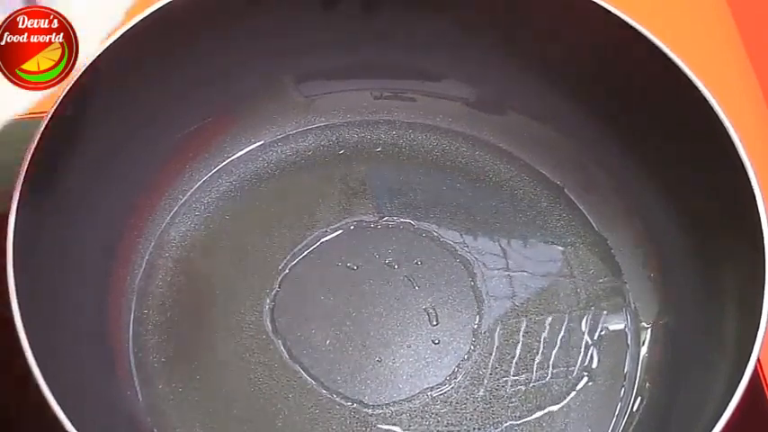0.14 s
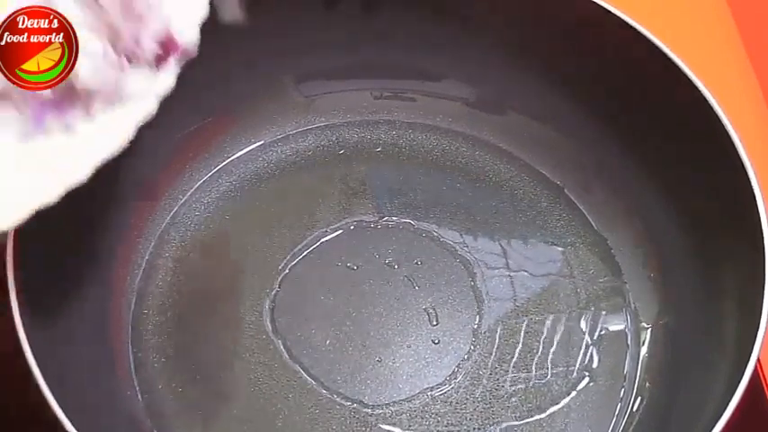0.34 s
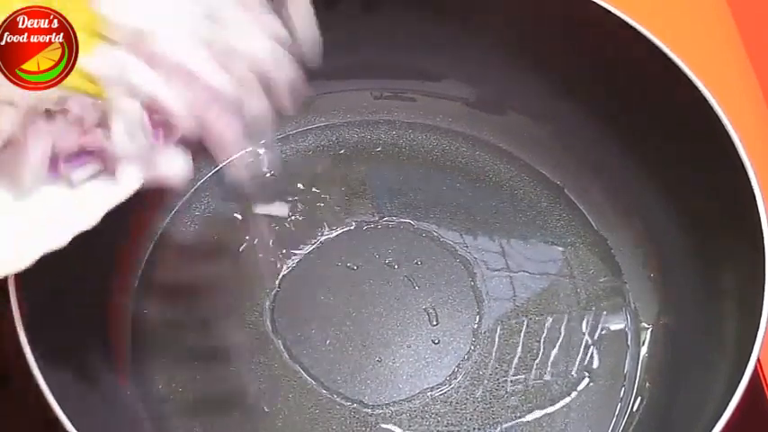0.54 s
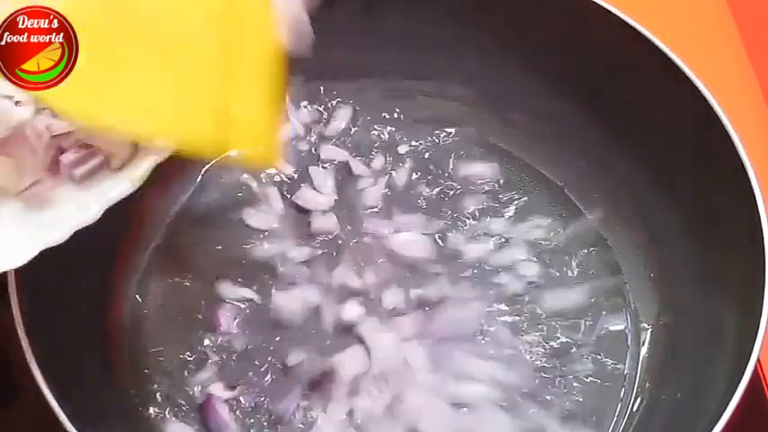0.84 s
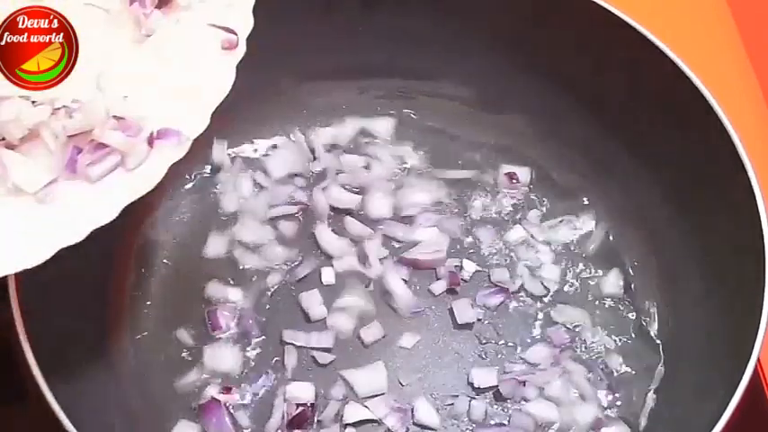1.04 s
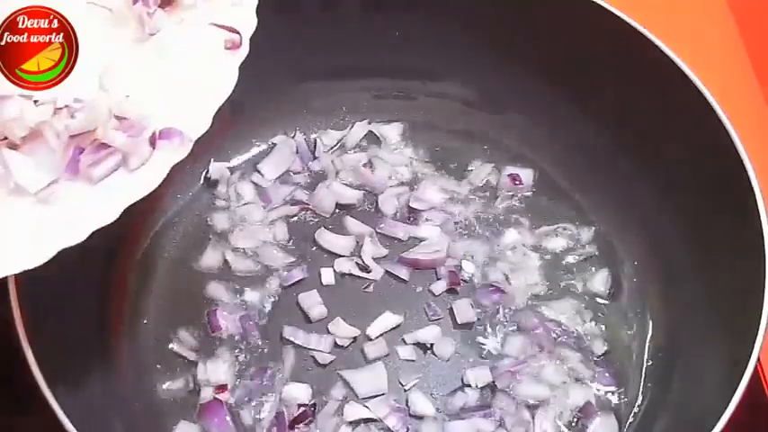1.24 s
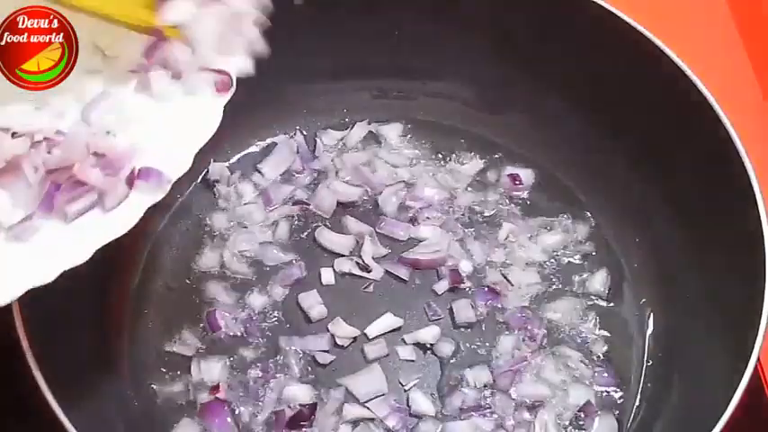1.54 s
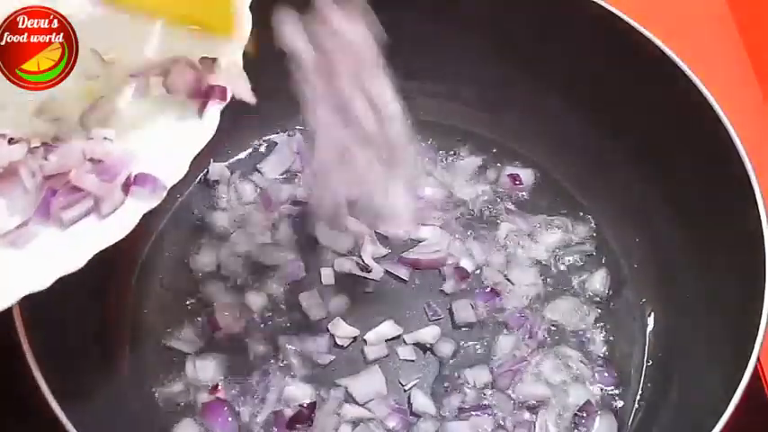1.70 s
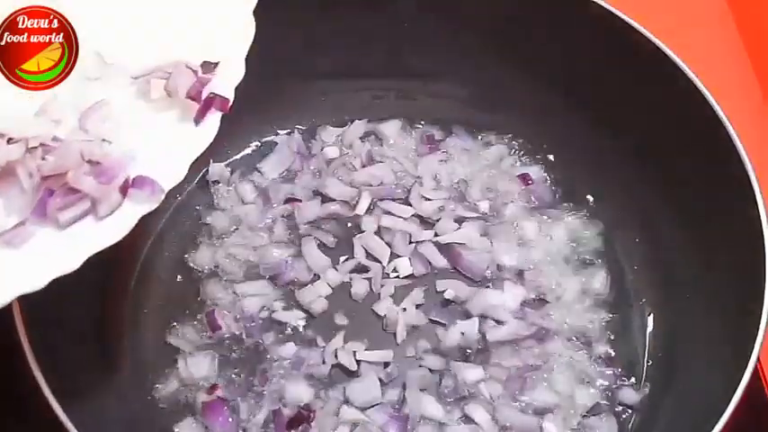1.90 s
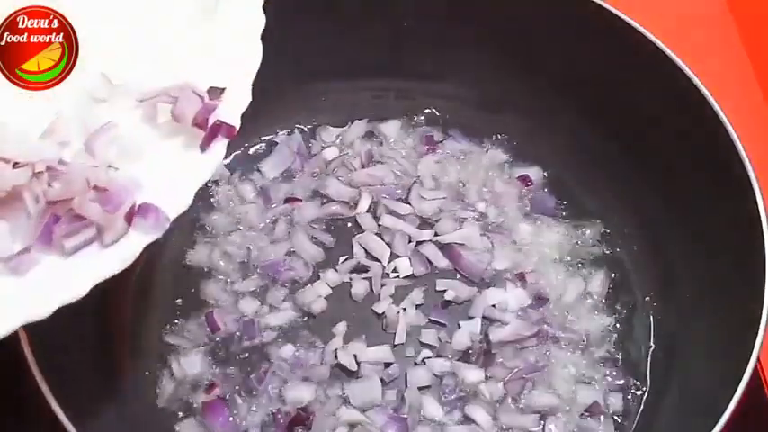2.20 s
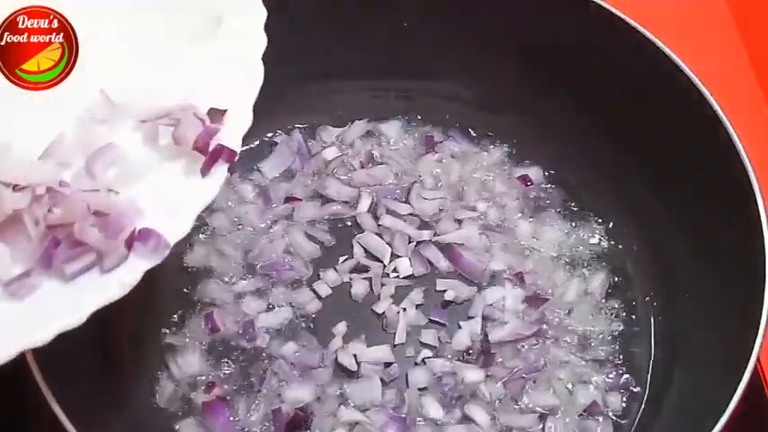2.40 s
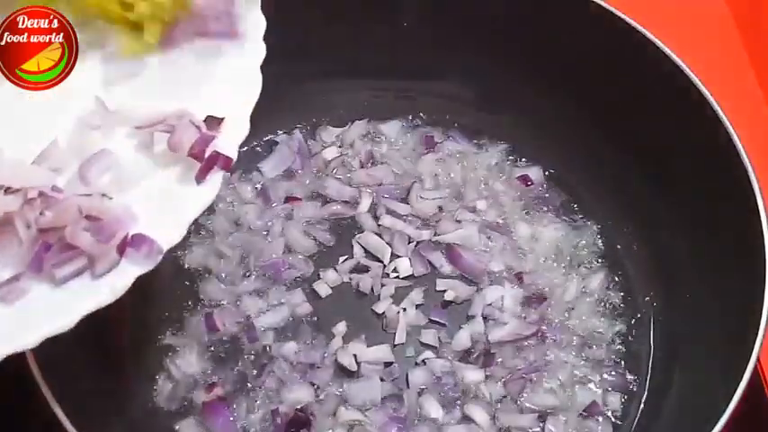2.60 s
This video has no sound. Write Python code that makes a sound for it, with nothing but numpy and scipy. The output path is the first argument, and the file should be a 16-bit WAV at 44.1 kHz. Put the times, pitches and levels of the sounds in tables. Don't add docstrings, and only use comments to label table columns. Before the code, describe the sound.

Chopped onion sizzles in hot oil: quiet room hum and light plate taps, one piece pings the bare pan, then thudding pieces set off dense crackle, with a smaller second fall; close microphone in a kitchen.

```python
import sys
import numpy as np
from scipy import signal
from scipy.fft import rfft, irfft
from scipy.io import wavfile

SR = 44100
rng = np.random.default_rng(int(sys.argv[2]) if len(sys.argv) > 2 else 0)


def invert_db(x):
    u = np.asarray(x, float) / 20
    return 10 ** u


def materialize(psi):
    bounded = np.clip(np.atleast_2d(psi).T, -1, 1)
    quanta = np.round(bounded * 32767).astype(np.int16)
    wavfile.write(sys.argv[1], SR, quanta)


N = 121275
CRACK_S = 0.00063
WALL_ECHO_S, WALL_ECHO_DB = 0.0052, -5.5


def rms_one(x):
    return x / np.sqrt(np.mean(x ** 2) + 1e-20)


def in_time(rows, outside=None):
    s, *columns = np.transpose(rows)
    return [np.interp(np.arange(N) / SR, s, c, outside, outside) for c in columns]


def drift(rate):
    r = np.exp(-40 * np.pi * rate / SR)
    slow = signal.lfilter([1], [1, -2 * r, r * r], rng.standard_normal(N // 20 + 4002))[4000:]
    return np.interp(np.arange(N) / 20, np.arange(len(slow)), rms_one(slow))


def ring(clicks, hz, t60):
    r, w = invert_db(-60 / (t60 * SR)), 2 * np.pi * hz / SR
    return signal.lfilter([0, np.sin(w)], [1, -2 * r * np.cos(w), r * r], clicks + 1e-18)


def soften(x, hz):
    r = np.exp(-2 * np.pi * hz / SR)
    return signal.lfilter([(1 - r) ** 2], [1, -2 * r, r * r], x)


def band_filter(edges, kind, order=2):
    return signal.butter(order, edges, kind, fs=SR, output="sos")


def colour(x, spectrum):
    hz, db = np.transpose(spectrum)
    grid = np.maximum(np.fft.rfftfreq(N, 1 / SR), 10)
    return rms_one(irfft(rfft(x) * invert_db(np.interp(np.log(grid), np.log(hz), db)), N))


def random_clicks(per_s, spread_db):
    sizes = invert_db(spread_db * np.minimum(rng.exponential(1, N), 5.0)) * rng.choice([-1, 1], N)
    return sizes * (rng.random(N) < per_s / SR)


def strike(events, modes, spread_db, focus_db=7):
    out = 0
    at, peak_db = (np.array(events)[:, 0] * SR).astype(int), np.array(events)[:, 1]
    chance = rng.standard_normal((len(events), len(modes)))
    for k, (hz, db, t60) in enumerate(modes):
        focus = [-focus_db * np.log2(hz / e[2]) ** 2 if len(e) > 2 else 0 for e in events]
        clicks = np.zeros(N)
        clicks[at] = invert_db(peak_db + db + focus + spread_db * chance[:, k])
        out = out + ring(clicks, hz, t60)
    return out


def background():
    # pitch in Hz, level in dB per Hz
    room = [(35, -21), (60, -9), (183, -16), (226, -15), (259, -18.5), (394, -23.5), (1120, -25.5),
            (1320, -29), (15500, -50)]
    # pitch in Hz, peak level in dB
    hum_tones = [(49.5, -46.5), (66, -90), (100, -52.5), (175, -65)]
    # time in seconds, gain in dB
    gain = [(0, 2.5), (.8, 4), (.95, -5), (1.8, -1.5), (2.75, 0.5)]
    t = np.arange(N) / SR
    hum = 0
    for hz, db in hum_tones:
        waver = invert_db(db + 1.8 * drift(4.0))
        hum = hum + waver * np.sin(2 * np.pi * hz * t + rng.uniform(0, 9.3))
    air = invert_db(-50) * soften(colour(rng.standard_normal(N), room), 14600)
    return invert_db(in_time(gain)[0]) * (hum + air)


def fizz():
    # time in seconds, level in dB, brightness tilt in dB per octave
    boil = [(.536, -70, 6), (.541, -44, 7), (.6, -46, 2), (.644, -50, 0), (.65, -38, 7), (.69, -40, 5),
            (.7, -30, 1), (.74, -28, 1), (.78, -25, 0), (.9, -24.5, 0), (1.05, -26, 0), (1.22, -29, 0),
            (1.42, -31, 0), (1.52, -29, -.5), (1.75, -29.5, .5), (1.97, -25.5, .5), (2.3, -27, 0),
            (2.75, -28.5, 0)]
    # pitch in Hz, level in dB per Hz
    spectrum = [(300, -14), (430, -7), (1000, -4.5), (2200, -2.5), (4500, 0.5), (7500, 2), (12800, -2.5),
                (15700, -16.5)]
    grain_db, hiss_db, crackle_db = -5, -1, -3
    patch_db, reach_db = 1.25, 2.0
    level_db, tilt_db = in_time([(0.049, -62.5, 0)] + list(boil))

    clump_db = 1 * drift(49)
    clicks = random_clicks(9000 * invert_db(clump_db), spread_db=4)
    t = np.arange(SR // 50) / SR
    spray = np.exp(-t / CRACK_S) + 0.15 * np.exp(-t / 0.0021)
    bursts = np.abs(random_clicks(120, spread_db=2.6))
    crackles = signal.fftconvolve(bursts, spray)[:N] * rng.standard_normal(N)
    crackles = crackles + invert_db(WALL_ECHO_DB) * np.roll(crackles, int(WALL_ECHO_S * SR))

    edges = np.geomspace(330, 15900, 19)
    dealt = rng.integers(0, 18, N)
    hz, db = np.transpose(spectrum)
    out, white = 0, rng.standard_normal((2, N))
    reach = [drift(80) for _ in range(10)]
    for k, (low, high) in enumerate(zip(edges, edges[1:])):
        f = np.sqrt(low * high)
        band_db = np.interp(np.log(f), np.log(hz), db) + 10 * np.log10(f / 6000)
        band_db = band_db + tilt_db * np.log2(f / 6000)
        pops = crackles * invert_db(reach_db * (reach[k // 2] + reach[(k + 1) // 2]))
        sources = [clicks * (dealt == k), white[k % 2], pops]
        grains, hiss, pops = signal.sosfilt(band_filter([low, high], "band"), sources)
        mix = invert_db(grain_db) * rms_one(grains) + invert_db(hiss_db) * rms_one(hiss) + invert_db(crackle_db) * rms_one(pops)
        out = out + invert_db(band_db + patch_db * drift(25)) * mix
    return invert_db(level_db) * rms_one(out)


def taps():
    # time in seconds, peak in dB
    tap_times = [
        (0.0642, -48),
        (0.2067, -46),
        (0.3023, -60),
        (1.2198, -46),
        (1.283, -27.5),
        (1.376, -40.5),
        (1.4715, -48),
        (1.536, -56),
        (1.74, -37),
    ]
    # pitch in Hz, level in dB, t60 in seconds
    plate = [(653, -15.5, 0.11), (1054, -11.5, 0.35), (1112, -2, 0.14), (1890, -10, 0.072)]
    return invert_db(4.0) * strike(tap_times, plate, spread_db=-1.5)


def first_piece():
    # time in seconds, peak in dB
    landing = [
        (.4605, -36.5),
    ]
    # pitch in Hz, level in dB, t60 in seconds
    bare_pan = [(427, -6.5, 0.42), (1437, -4, 0.2), (2200, -18, 0.16), (3270, -5.5, 0.077),
                (6400, -4, 0.036)]
    return strike(landing, bare_pan, spread_db=0.5)


def squeak(t):
    low_hz, high_hz, glide_s, fade_s = 2920, 3360, 0.0022, 0.013
    pitch = high_hz - (high_hz - low_hz) * np.exp(-t / glide_s) + 260 * drift(150)[:len(t)]
    flutter = invert_db(-18.5 + 4.4 * drift(87)[:len(t)]) * np.exp(-t / fade_s) * (1 - t / t[-1])
    crack = invert_db(-15) * np.diff(rng.standard_normal(len(t) + 1)) * np.exp(-t / CRACK_S)
    return flutter * np.sin(2 * np.pi * np.cumsum(pitch) / SR) + crack


def spits():
    # time in seconds, peak in dB, pitch in Hz, ring in cycles
    bursts = [(0.4605, -26, 4050, 26), (0.5655, -28, 8760, 10), (0.584, -17.5, 6340, 16),
              (0.6992, -8, 5500, 37), (0.7149, -9.5, 5700, 24), (0.7479, -2.5, 5640, 18),
              (0.821, -6, 6290, 10), (0.8266, -5.5, 7400, 18), (0.844, -5.5, 7700, 8.5),
              (0.8692, -2.5, 5170, 19), (0.8998, -0.5, 6750, 18), (0.9747, -0.5, 8950, 14),
              (1.04, -3, 6900, 5.3), (1.089, -8, 3230, 8.7), (1.1555, -0.5, 9370, 23),
              (1.181, -6, 7950, 4.2), (1.3092, -2, 7760, 9.5), (1.4729, -14, 3370, 7),
              (1.5028, -5, 5500, 4.1), (1.525, -19.5, 3430, 22), (1.537, -17.5, 3700, 21),
              (1.5891, -0.5, 7640, 2.5), (1.6194, -4.5, 9200, 14), (1.8489, -2, 5870, 4.6),
              (2.0415, 0.5, 9700, 5), (2.0872, -7, 7200, 25), (2.183, -2, 8330, 24),
              (2.229, -2.5, 3600, 6.2), (2.583, -2, 5600, 6)]
    out, t = np.zeros(N + SR), np.arange(SR // 10) / SR
    crack = invert_db(2) * np.exp(-t / CRACK_S) + invert_db(-18) * np.exp(-t / 0.026)
    rise = np.minimum(t / 0.0003, 1)
    for s, db, hz, cycles in bursts:
        edges = [hz / 2, min(hz * 2, .4 * SR)]
        noise = rms_one(signal.sosfilt(band_filter(edges, "band"), rng.standard_normal(len(t))))
        cavity = np.sin(2 * np.pi * hz * t) * invert_db(-60 * t * hz / cycles)
        out[int(s * SR):][:len(t)] += invert_db(db + 2) * (cavity + 0.28 * noise * crack) * rise
    out[int(1.4745 * SR):][:len(t)] += squeak(t)
    echo = soften(np.roll(out, int(WALL_ECHO_S * SR))[:N], 9500)
    return out[:N] + invert_db(WALL_ECHO_DB) * echo


def ticks():
    # time in seconds, peak in dB, pitch in Hz
    droplets = [(.5473, -34, 7600), (.5537, -42, 7800), (0.562, -41, 8900), (.6497, -31, 8100),
                (0.658, -22, 8500), (0.7768, -2, 8600), (0.826, 3.5, 6400), (0.8442, -4, 6700),
                (0.9078, -8, 7200), (.9752, -3, 9200), (1.0568, -11, 6900), (1.0956, -10, 6500),
                (1.1549, -3.5, 9400), (1.2212, -9, 7300), (1.2276, -10, 8900), (1.2316, -13, 9400),
                (1.31, -3, 11000), (1.349, -8, 6100), (1.4005, -6, 9800), (1.4748, -1.5, 8900),
                (1.5185, -14, 8700), (1.5604, -13, 6400), (1.5847, -8, 10200), (1.5927, -2.5, 8600),
                (1.6208, -10, 6000), (1.7, -6.5, 10800), (1.711, -7.5, 7300), (1.9283, -1.5, 9300),
                (2, -0.5, 10500), (2.006, -10, 11500), (2.017, -5, 10300), (2.0463, -4.5, 5540),
                (2.0876, -5.5, 7860), (2.1075, -8, 8950), (2.158, -19, 5200), (2.1834, -21, 3970),
                (2.2257, -6.5, 5600), (2.229, -11, 5300), (2.249, -14, 6000), (2.291, -10, 8900),
                (2.385, -10, 9200), (2.42, -9, 8300), (2.4386, -12, 8200), (2.523, -7, 10000),
                (2.717, -8, 5800)]
    lead = 44
    out, t = np.zeros(N + SR), np.arange(-lead, 397) / SR
    noise = rng.standard_normal((len(droplets), len(t)))
    spray_shape = invert_db(-13.5) * np.exp(-np.abs(t) / 0.00058) * (t > -.0004)
    for (s, db, hz), hiss in zip(droplets, noise):
        pulse = np.cos(2 * np.pi * hz * t + 0.25) * np.exp(-(t * hz / 0.81) ** 2)
        spray = spray_shape * rms_one(np.diff(soften(hiss, hz / 2), prepend=0))
        out[int(s * SR) - lead:][:len(t)] += invert_db(db) * (pulse + spray)
    out = invert_db(-1) * soften(out, 14000)
    return out[:N] + invert_db(-4.5) * np.roll(out, int(WALL_ECHO_S * SR))[:N]


def thuds():
    # time of greatest swing in seconds, peak in dB, pitch in Hz
    landings = [(.649, -22.5, 622), (.65, -29, 1484), (.665, -24.5, 1450), (.69, -27, 1420),
                (.78, -30, 1510), (.8, -21, 1450), (.666, -21, 612), (.667, -22, 970), (.686, -21, 592),
                (.687, -22, 950), (.708, -26, 970), (.732, -12.5, 994), (.748, -13, 907), (.758, -19, 556),
                (.766, -15, 1000), (.773, -15, 910), (.783, -16.5, 605), (.794, -13.5, 603),
                (.805, -11.5, 581), (.816, -10.5, 558), (.814, -12, 915), (.826, -19, 950),
                (.835, -15, 960), (.843, -21, 893), (.854, -17, 528), (.87, -22, 944), (.898, -24, 985),
                (.919, -20, 990), (.919, -21.5, 558), (.942, -26, 573), (.962, -30, 930),
                (1.033, -24, 1056), (1.793, -28, 965), (1.807, -30, 630), (1.825, -17, 1016),
                (1.832, -23, 2180), (1.865, -27, 1376), (1.79, -29, 530), (1.862, -20, 862),
                (1.86, -25, 600), (1.873, -23, 540), (1.89, -21, 584), (1.9, -28, 595), (1.913, -23, 587),
                (1.925, -21.5, 532), (1.944, -28, 538), (1.945, -26, 1860), (1.96, -23, 538),
                (1.974, -28.5, 536), (1.99, -33, 547), (0.763, -25, 2610), (.817, -18, 2150)]
    rise_s, puff_hz = 0.00321, 1700
    out, t = np.zeros(N), np.arange(SR // 20) / SR
    swell = t / rise_s * np.exp(1 - t / rise_s)
    noise = rng.standard_normal((len(landings), 2, len(t)))
    for (s, db, hz), (waver, puff) in zip(landings, noise):
        tone = np.sin(2 * np.pi * hz * t + .45 * rms_one(soften(waver, 150)))
        puff = invert_db(-9) * rms_one(np.diff(soften(puff, puff_hz), prepend=0))
        out[int((s - rise_s) * SR):][:len(t)] += invert_db(db - 2) * swell * (tone + soften(puff, 2 * puff_hz))
    return out


def pan():
    # time in seconds, level in dB
    first_fall = [(.64, -58), (.648, -32), (.722, -27), (.73, -21.5), (.82, -24), (.86, -32), (.96, -34.5),
                  (1.0, -39.5), (1.12, -43)]
    second_fall = [(1.77, -49), (1.79, -27), (1.815, -38), (1.825, -21), (1.845, -25.5), (1.86, -24.5),
                   (1.93, -29.5), (1.99, -40), (2.03, -43)]
    # time in seconds, peak in dB, pitch in Hz of the modes struck best
    lumps = [
        (0.729, -17, 1500),
        (0.802, -7.5, 2140),
        (0.755, -17, 2500),
        (1.089, -26, 1160),
        (1.59, -24, 900),
        (2.181, -23.5, 1370),
        (2.227, -25.5, 883),
    ]
    # pitch in Hz, level in dB, t60 in seconds
    pan_modes = [(226, -10.5, 0.1), (433.6, -8.5, 0.3), (511, -9, 0.18), (538, -7.5, 0.49),
                 (604, -15, 0.16), (631, -2, 0.13), (665, -5.5, 0.058), (815, -13, 0.21), (910, -2, 0.066),
                 (946, 0, 0.15), (1084, 3, 0.069), (1451, -2.5, 0.15), (1465, 2.5, 0.03),
                 (2140, -1.5, 0.07)]
    modes = list(pan_modes) + [(2545, -4.5, .18)]
    first = invert_db(in_time(first_fall, outside=-99)[0])
    second = invert_db(in_time(second_fall, outside=-99)[0])
    thud = thuds()
    drum, rung = 0, 0
    for hz, db, t60 in modes:
        pieces = rms_one(random_clicks(980, spread_db=2.5))
        contact = soften(first * pieces, 1760) + soften(second * pieces, 600)
        drum = drum + invert_db(db) * ring(contact, hz, t60)
        rung = rung + invert_db(db) * ring(thud, hz, t60)
    heavy = soften(strike(lumps, modes, spread_db=-3.5), 6500)
    out = invert_db(-27.5) * drum + invert_db(-11.5) * heavy + thud + invert_db(-57.5) * rung
    out = signal.sosfilt(band_filter([265, 390], "bandstop"), out)
    return signal.sosfilt(band_filter(200, "high"), out)


def kitchen(x):
    t = np.arange(SR // 2) / SR
    cloud = rng.standard_normal(len(t)) * invert_db(-60 * t / 0.13) * (t > .008)
    return signal.fftconvolve(x, soften(cloud, 10000) / np.sqrt(np.sum(cloud ** 2)))[:N]


def scene():
    near = taps() + first_piece() + spits() + ticks() + pan()
    return (background() + fizz() + near + invert_db(-29) * kitchen(near))[None]


def band_limit(x):
    return signal.sosfilt(signal.butter(12, 16470, fs=SR, output="sos"), x)


def record(dry):
    rounded = np.tanh(dry / 1.1) * 1.1
    top_cut = signal.ellip(10, .5, 60, 15650, fs=SR, output="sos")
    mix = signal.sosfilt(top_cut, rounded)
    return band_limit(mix)


dry = scene()
out = record(dry)
materialize(out)
```